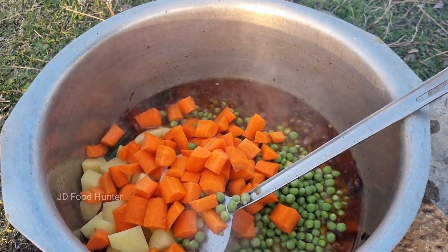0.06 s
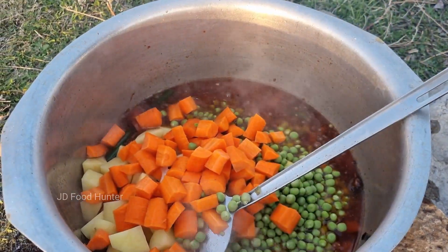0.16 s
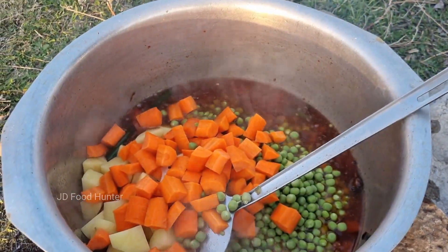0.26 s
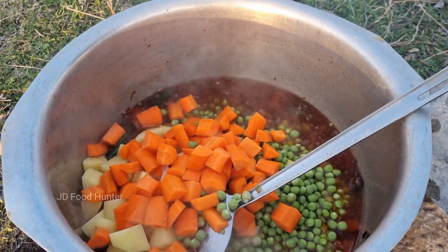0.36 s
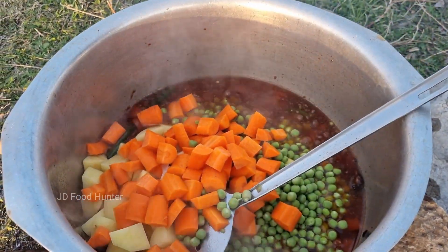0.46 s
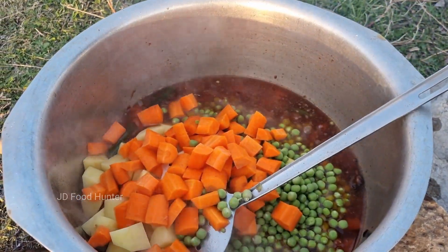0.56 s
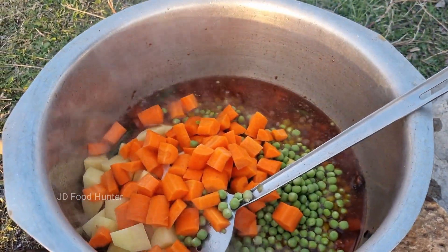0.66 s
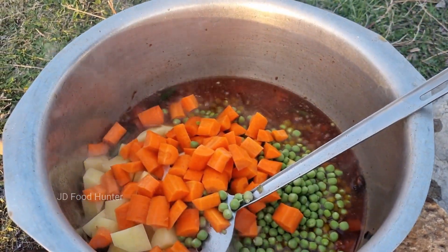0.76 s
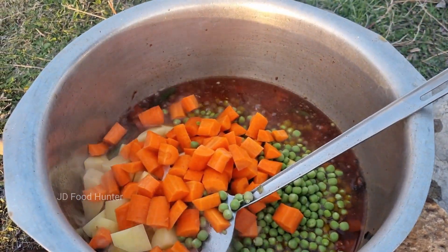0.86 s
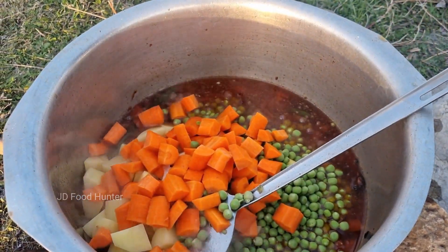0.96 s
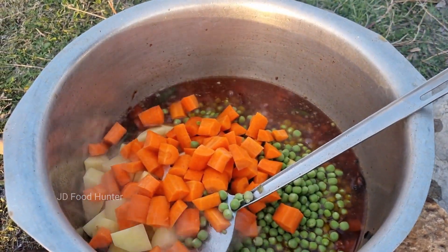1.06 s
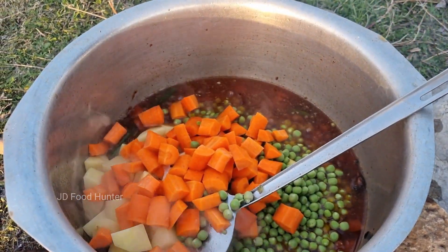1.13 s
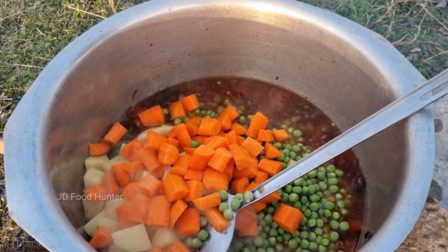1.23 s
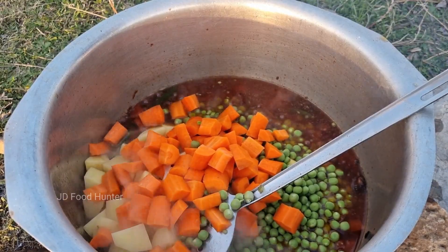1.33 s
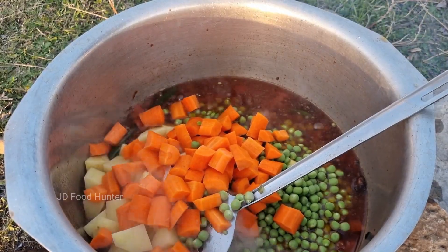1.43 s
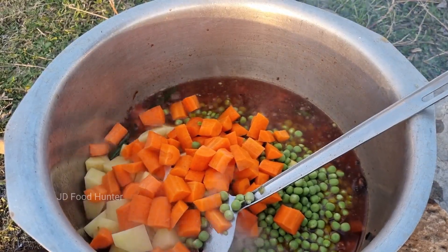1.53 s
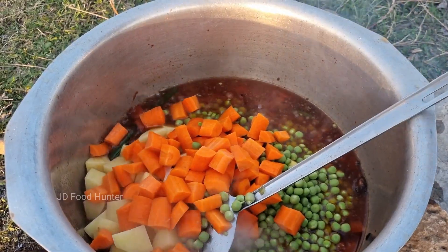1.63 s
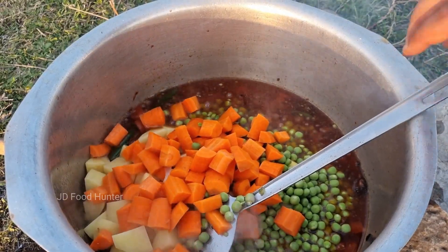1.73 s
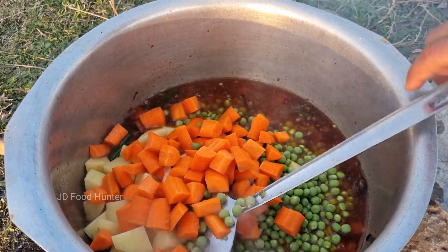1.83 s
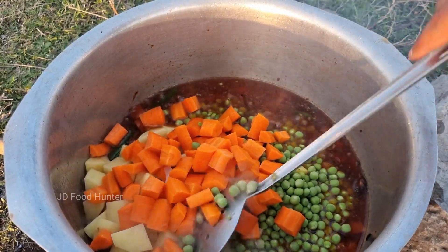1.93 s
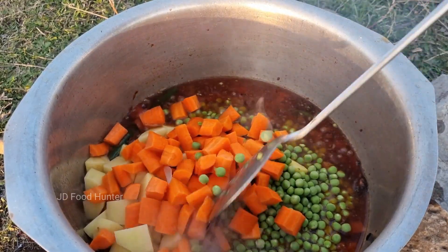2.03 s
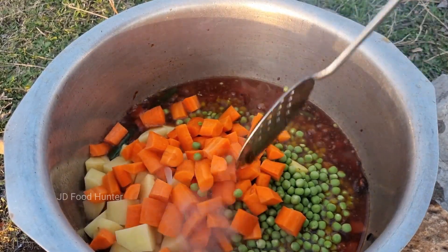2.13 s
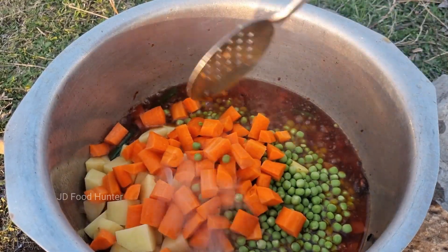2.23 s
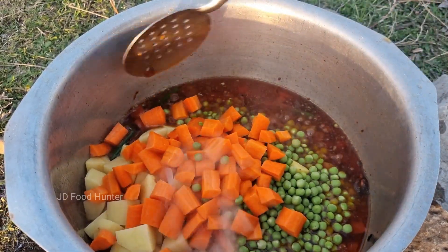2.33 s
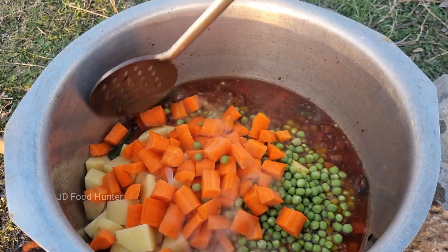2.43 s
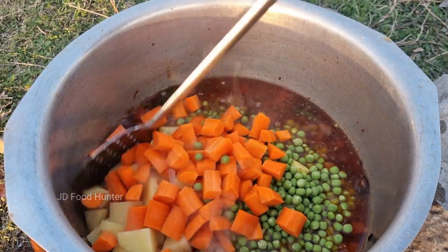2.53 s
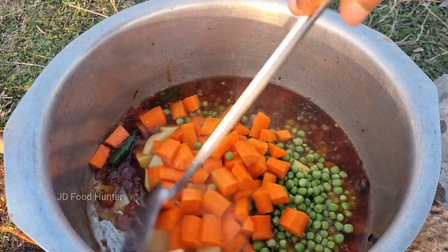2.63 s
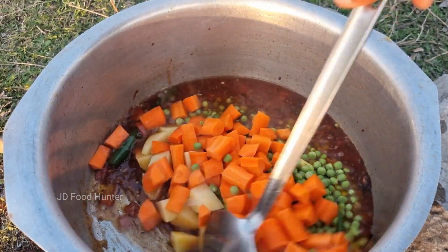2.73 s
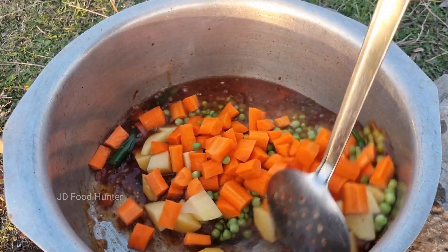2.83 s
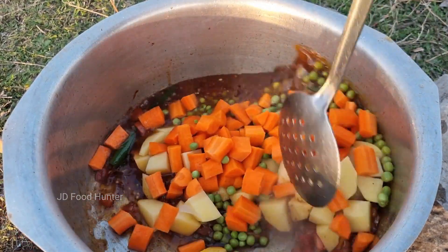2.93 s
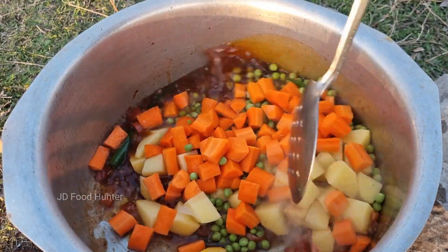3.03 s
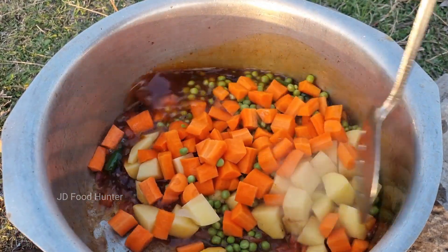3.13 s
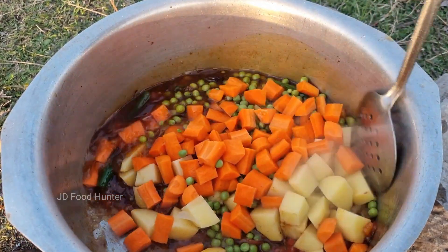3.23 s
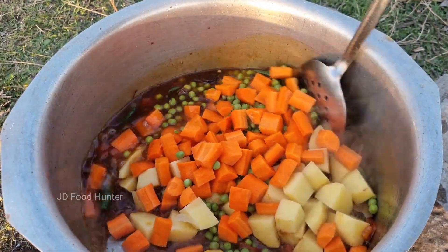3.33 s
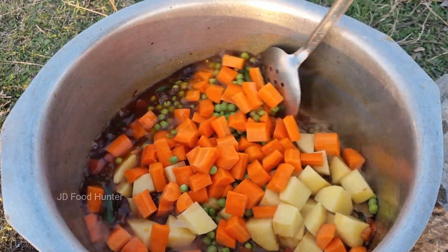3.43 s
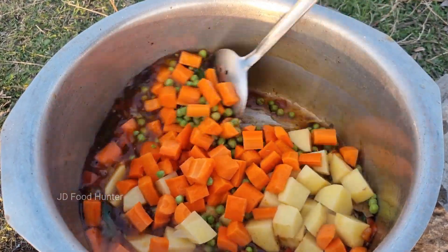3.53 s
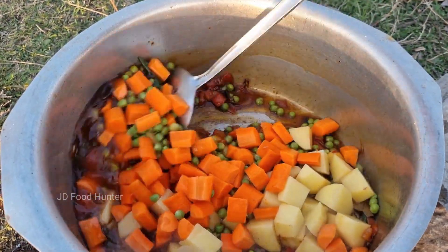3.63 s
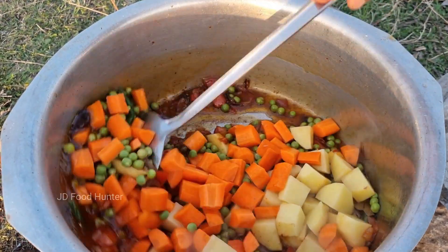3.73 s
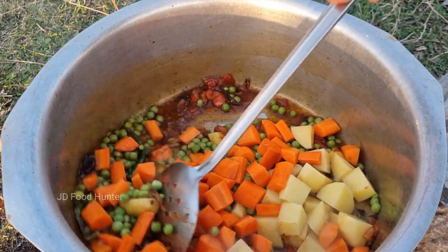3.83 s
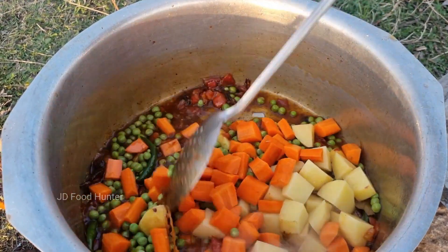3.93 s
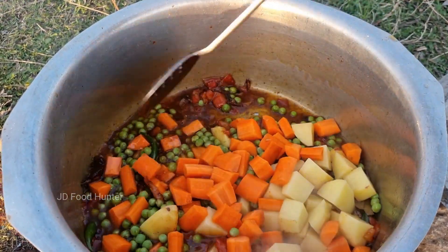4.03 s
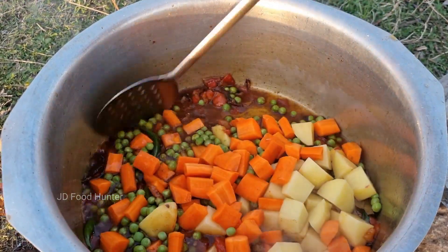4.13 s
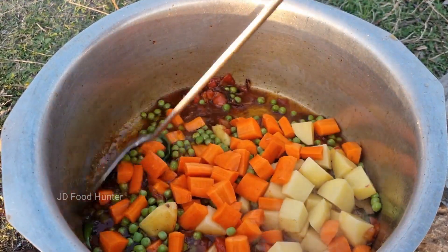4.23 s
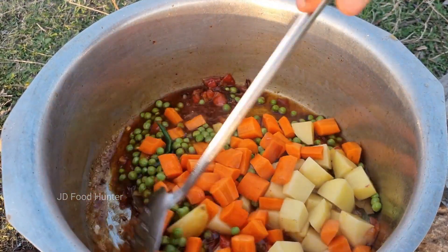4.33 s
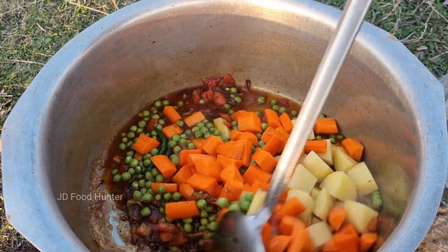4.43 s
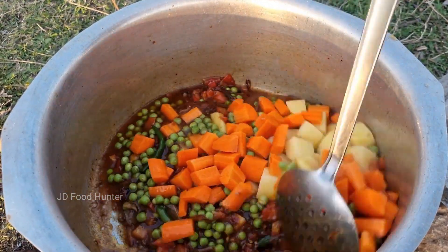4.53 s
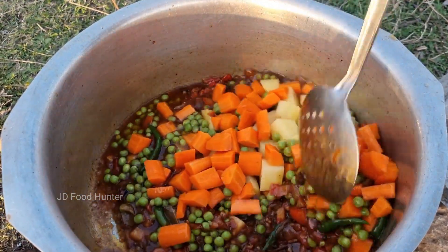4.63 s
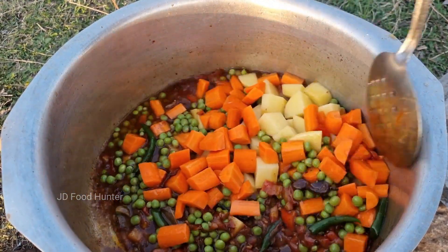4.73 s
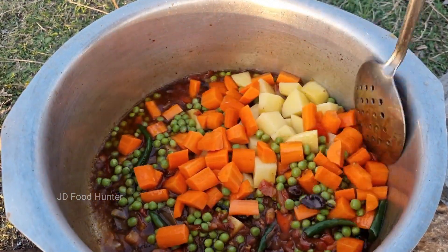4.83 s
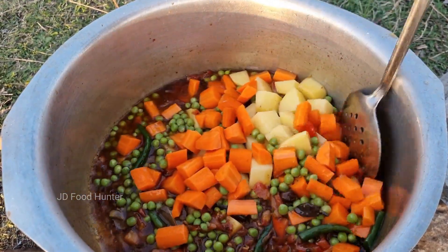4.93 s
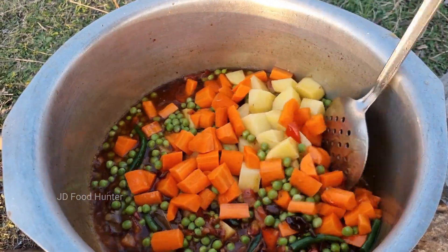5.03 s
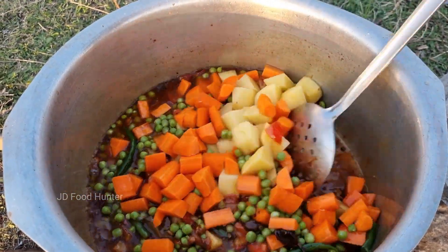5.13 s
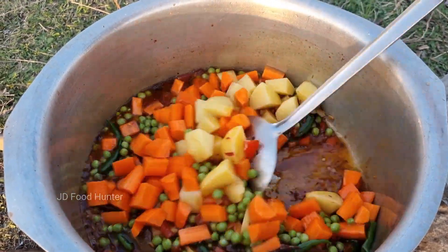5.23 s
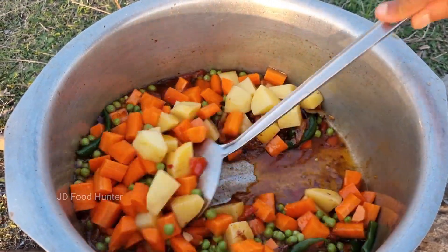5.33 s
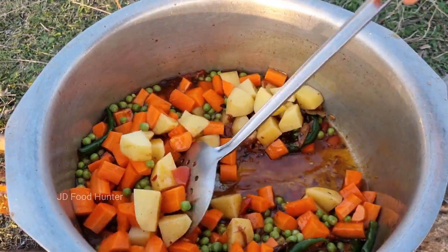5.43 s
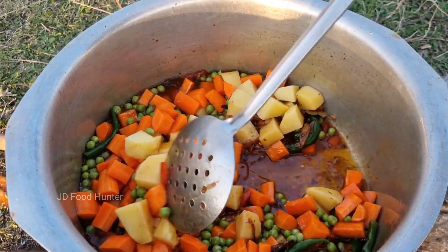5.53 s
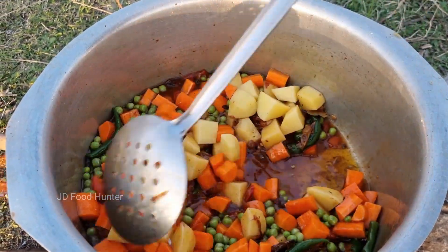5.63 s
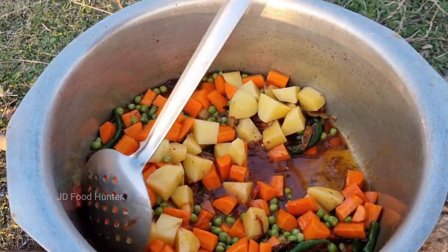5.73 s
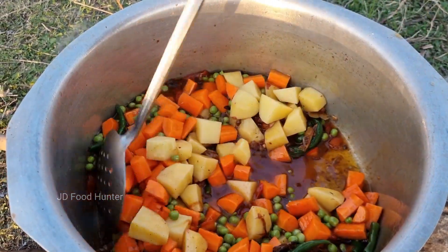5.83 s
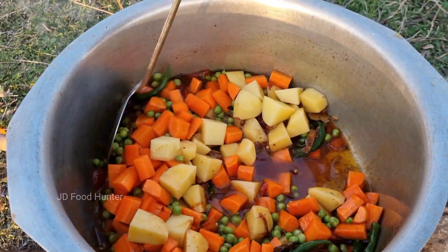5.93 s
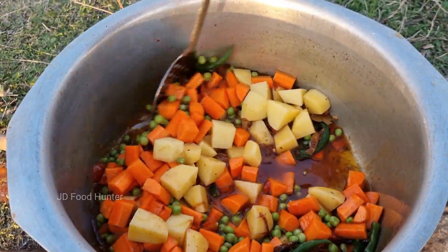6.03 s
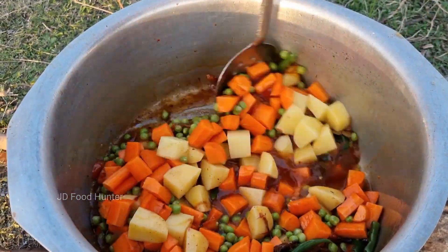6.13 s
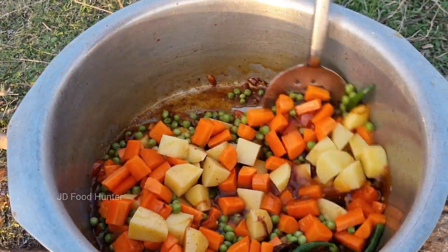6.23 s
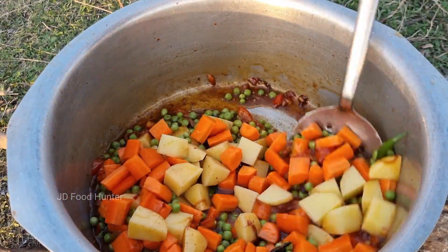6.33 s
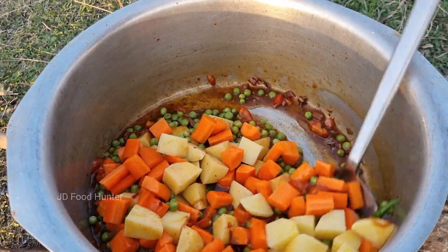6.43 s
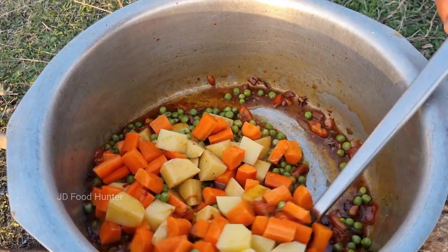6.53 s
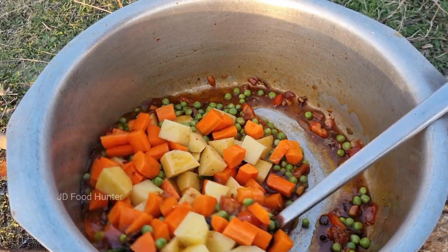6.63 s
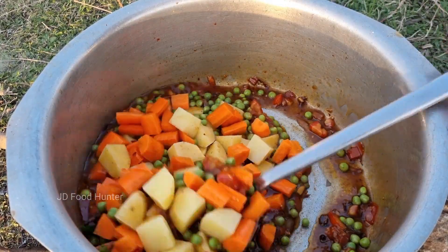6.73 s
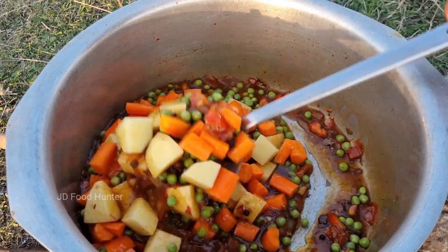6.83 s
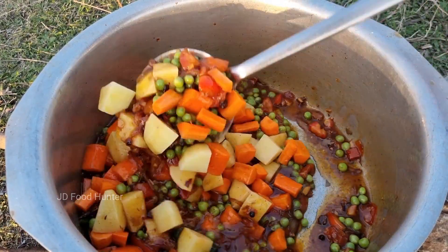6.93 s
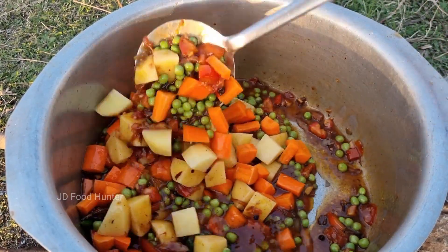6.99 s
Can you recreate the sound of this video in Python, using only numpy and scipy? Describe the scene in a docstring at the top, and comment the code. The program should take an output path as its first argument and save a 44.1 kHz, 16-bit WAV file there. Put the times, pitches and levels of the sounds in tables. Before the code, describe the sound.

Vegetables sizzle faintly in oil in a large metal pot outdoors, while metalware clatters a few steps away and a distant bird whistles. After about two seconds a steel ladle starts stirring close to the microphone. It knocks and rings on the pot, scrapes along the wall and floor, and squeals briefly. Pieces bump and plop into the sauce, the oil spits now and then, and a low fire rumbles underneath.

```python
"""An open-air kitchen: a perforated steel ladle knocks on a wide aluminium pot, rings, and scrapes along
its floor through frying vegetables. Steam bubbles burst and spit in the oil, firm pieces bump the pot,
soft ones plop into the sauce, and the fire rumbles below. Metalware clatters a few steps away and a far
bird whistles. The microphone ports lie a hand apart, the left one nearer the pot."""
import sys
import numpy as np
from scipy import signal
from scipy.fft import rfft, irfft, next_fast_len
from scipy.io import wavfile
from scipy.ndimage import uniform_filter1d, map_coordinates

SR = 44100
rng = np.random.default_rng(int(sys.argv[2]) if len(sys.argv) > 2 else 0)


def dump_mix(stems):
    """Bounce the given channels to the path in sys.argv[1] as a 16-bit WAV at rate SR."""
    frames = np.atleast_2d(stems).T  # one column per channel
    limited = np.clip(frames, -1, 1)  # hard clip at full scale
    pcm = np.round(limited * 32767).astype(np.int16)
    wavfile.write(sys.argv[1], SR, pcm)


N = 311346

# Fader rides for the oil and for the fire with its draught. Each row: time in seconds, level in dB.
OIL_RIDE = [(0, -53.5), (.9, -52.5), (1.05, -53), (1.3, -54), (2.4, -51.5), (2.85, -51), (3.2, -52.5),
            (3.9, -56), (4.15, -59), (4.55, -57), (4.8, -57.5), (5.45, -63.5), (5.72, -60.5), (6.68, -55.5),
            (7.06, -58)]
FIRE_RIDE = [(0.0, -62.5), (2.79, -58.5), (3.28, -43), (3.36, -53), (3.48, -37.5), (3.64, -50.5),
             (3.87, -43), (3.95, -55.5), (5.11, -49.5), (5.23, -52), (7.06, -56)]
# Tone colours of oil, fire, steel striking and steel scraping. Each row: frequency in Hz, level in dB.
FIZZ_EQ = [(88, -28), (150, -9), (275, -8), (322, -0.5), (407, 3), (677, -15), (791, -1.5), (890, -10.5),
           (1480, -7), (2020, -15), (3500, -9.5), (7810, -24.5), (12700, -22), (16100, -25.5)]
RUMBLE_EQ = [(15, -35), (30, -12.5), (70, -2.5), (118, -4), (172, -12.5), (290, -16), (480, -120)]
CRACK_EQ = [(590, -9), (1000, -10), (2290, -7), (2630, -9.5), (3380, -6.5), (4330, -5.5), (8680, -15),
            (12700, -12), (15300, -16), (16800, -46.5)]
RASP_EQ = [(760, -50), (1300, -4.5), (1880, -8), (2320, -12), (3180, -1.5), (3850, -9), (6050, -10.5),
           (7870, -20.5), (12600, -17.5), (14800, -22), (16100, -29)]
# Stereo image of the fizz. Each row: frequency in Hz, left-right likeness from -1 to 1.
FIZZ_IMAGE = [(60, 0.82), (380, 0.95), (2380, -0.18), (15000, 0.1)]
# Far metalware hits. Each row: start in seconds, level in dB, treble tilt in dB per octave.
CLATTERS = [(0.3072, -12.5, -1.5), (0.339, -15.5, -1), (0.46, -19, -2), (0.894, -23, -5)]
# Modes of the metalware, the whole ladle, its bowl and its handle.
# Each row: pitch in Hz, level in dB, t60 in seconds.
WARE_MODES = [(450, -3, .05), (590, -11, .16), (750, -1, .06), (950, -3, .035), (1240, -20, .3),
              (1650, -5, .07), (2090, -19, .15), (2330, -11, .05), (2730, -24, .25), (3700, -15, .04),
              (5650, -13, .04)]
LADLE_MODES = [(912, -6, .35), (1120, -8, .6), (1275, -7, 1.1), (1615, -13, .3), (1810, -11, .8),
               (2014, -7, .7), (3070, -14, .11), (3260, -12, .11)]
BOWL_MODES = [(3666, -23, .4), (4134, -22, .4), (4538, -26, .3), (4926, -27, .3), (5534, -27, .2),
              (6363, -16, .21), (7101, -21, .09), (8236, -23, .23)]
HANDLE_MODES = [(1463, -12, .4), (2460, -23, .6), (4845, -18, .22), (6192, -9, .15), (6277, -13, .28),
                (7838, -23, .35), (9895, -22, .35)]
# Reverb of the surroundings. Each row: frequency in Hz, t60 in seconds.
YARD_DECAY = [(300, 0.05), (2000, 0.62), (7000, 0.26)]
# Soft rustles near the clatter. Each row: start in seconds, level in dB.
RUSTLES = [(0.612, -50), (0.675, -50), (0.828, -51)]
# Bird calls. Each row: start and length in seconds, first and settling pitch in Hz, level in dB.
WHISTLES = [(0.673, 0.165, 3000, 1730, -50), (1.197, 0.165, 2990, 1730, -50.5),
            (1.5, 0.125, 3500, 2050, -58), (1.642, 0.06, 2150, 1800, -55), (2.071, 0.052, 2150, 1760, -54)]
# Loud spits of oil. Each row: start in seconds, level in dB.
SPITS = [(2.068, -28), (2.0946, -31), (2.12, -42.5), (3.768, -22), (3.851, -32), (5.127, -36),
         (6.8855, -36)]
# Resonances of the pot's air and of its floor under the food. Each row: pitch and width in Hz, level in dB.
POT_AIR = [(400, 170, 5)]
POT_FLOOR = [(774, 103, -2), (1112, 166, -6.5)]
# Firm food hits the pot. Each row: start in seconds, floor and air levels in dB.
BUMPS = [(2.158, -37, -41), (2.168, -31.5, -47), (2.23, -37.5, -39), (2.789, -17, -24),
         (2.9267, -27.5, -45), (3.017, -33.5, -46), (3.08, -37.5, -49), (5.37, -28.5, -45),
         (5.9651, -34, -27), (6.246, -24.5, -31), (6.691, -35, -49), (7.039, -40.5, -44)]
# Steel hits the pot. Each row: start in seconds, crack, air and floor levels in dB, pitch of the ladle's brief
# ping in Hz.
KNOCKS = [(2.4466, -3, -39, -48, 3400), (2.5433, -21, -33.5, -25, 2160), (2.5831, -8.5, -28.5, -22.5, 3810),
          (2.6796, -18.5, -35.5, -26, 1960), (2.727, -17, -35, -28, 1900), (3.2217, -4, -22.5, -34, 3510),
          (3.3056, -7, -21, -23, 3290), (3.3856, -17.5, -22, -24.5, 2650), (4.151, -9, -51, -52, 2190),
          (4.193, -9.5, -5.5, -13, 3310), (4.2069, -5.5, -38, -32, 3124), (4.796, -4, -19.5, -26.5, 3280),
          (4.8096, -7.5, -19.5, -25.5, 2220), (4.8435, -25, -50, -33.5, 1970),
          (4.8905, -14.5, -27, -32, 3480), (4.9447, -8.5, -22.5, -14.5, 3310),
          (4.993, -6.5, -13, -10.5, 1170), (5.7351, -8.5, -25, -29, 3280), (5.737, -16, -57, -35, 2120),
          (5.7936, -15, -55, -28.5, 3030), (6.4428, -18.5, -25, -27, 3200), (6.772, -33.5, -59, -64, 3080)]
# Blows that let the ladle ring. Each row: start in seconds, level in dB, treble tilt in dB per octave,
# time it meets the food and t60 of that damping in seconds, favoured pitch in Hz, bowl over handle in dB.
RINGS = [(2.446, -23, 0, 2.745, 0.08, 2014, 14), (2.64, -38, 2, 2.745, 0.08, 2014, 4),
         (3.227, -24, -0.5, 3.27, 0.084, 2014, -4), (3.4, -38.5, -2.5, 3.63, 0.16, 2014, 0),
         (4.153, -36, 1, 4.19, .3, 1275, -6), (4.206, -29.5, 0.5, 4.38, 0.18, 2014, 0),
         (4.797, -21, 0, 4.86, 0.4, 2014, -10), (4.993, -42, -1, 5.17, 0.1, 2460, -8),
         (5.737, -30, 1, 5.93, 0.15, 1275, -10), (5.852, -45, 0, 6.12, .1, 1615, 0)]
# The ladle skids down the wall. Each row: start and length in seconds, rasp and floor levels in dB.
SKIDS = [(2.579, 0.19, -28, -41), (3.231, 0.27, -25, -42), (4.206, 0.082, -36, -34),
         (4.807, 0.124, -31.5, -44), (5.797, 0.156, -38.5, -46), (6.118, 0.15, -32.5, -45.5)]
# It drags along the floor. Each row: start, length and rise in seconds, fastest point as a share of the
# length, levels of rasp, air, lower and upper floor note in dB, shift toward the upper note in dB.
DRAGS = [(3.5, 0.3286, 0.029, 0.35, -42.5, -31.5, -41.5, -47.5, -11.5),
         (4.231, 0.25, 0.036, 0.56, -38, -41, -36, -55, 14),
         (5.096, 0.3, 0.071, 0.61, -38, -24.5, -51.5, -45.5, -26),
         (5.959, 0.369, 0.0065, 0.76, -40.5, -38, -39.5, -60, 42.5),
         (6.281, 0.32, 0.016, 0.64, -41.5, -37.5, -42.5, -46.5, 10)]
# Its rim squeals. Each row: start and length in seconds, first and last pitch in Hz, level in dB.
SQUEALS = [(3.2, 0.042, 2510, 2385, -29), (3.263, 0.16, 2990, 3200, -28.5), (3.265, 0.1, 1990, 2513, -27),
           (6.098, .12, 3220, 2830, -34.5)]
# Soft food lands. Each row: start in seconds, level in dB, first pitch in Hz.
PLOPS = [(3.414, -31, 372), (3.972, -38, 717), (5.515, -39.5, 348), (5.676, -38.5, 354), (6.69, -28, 373),
         (6.804, -35.5, 366), (6.995, -45, 282), (7.03, -42.5, 348)]
# The ladle's places in the pot. Each row: start in seconds, the left port's treble lead in milliseconds.
LEFT_LEADS = [(0, .36), (2.87, 0.13), (4.05, 0.37), (4.7, 0.33), (5.103, 0.12), (5.599, 0.35),
              (5.943, 0.11)]
# Balance of the pot between the ports. Each row: frequency in Hz, left minus right in dB.
PORT_BALANCE = [(100, 3.5), (700, 3), (2400, 7), (5000, 2), (9000, 1.5), (15000, -8)]

TOP_HZ = 16980  # band limit
BUMP_CRACK_DB, BUMP_PING_HZ = -17, 1500  # a bump's crack sits under its floor level
THUD_S, PUSH_S = 0.0098, 0.0038  # how long a contact drives the pot's air and its floor
THUMP_HZ, THUMP_DB = 250, -15  # the whole pot gives; level against the air
MUTE_HZ = 2000  # the t60 in the food holds here; lower modes last longer
SKID_FADE_DB_PER_S, SKID_AIR_DB = 78.5, -5.5  # a skid dies as it slows; air against floor
SLOW_RASP_DB, SLOW_AIR_DB = 7.5, 17  # loss per drag length away from the fastest point
DRAG_WIDTH, DRIFT_S, SWELL_DB = .45, .003, 2.2  # scraped pot notes narrow, drift in pitch and swell
PLOP_CYCLES, PLOP_RISE = 4, .08  # life of a plop; share by which it climbs in that time


def amp(db):
    """Decibels to gain."""
    return 10 ** (np.asarray(db) / 20)


def unit(x):
    """Scale to rms 1."""
    return x / np.sqrt(np.mean(x ** 2) + 1e-20)


def along(points, hz):
    """Read (Hz, value) points on a log axis."""
    f, v = np.transpose(points)
    return np.interp(np.log(hz + 1), np.log(f + 1), v)


def fader(ride):
    """Gain per sample from (seconds, dB) points."""
    return amp(np.interp(np.arange(N) / SR, *np.transpose(ride)))


def wobble(rate):
    """A smooth random curve, rate knots a second."""
    return map_coordinates(rng.standard_normal(int(N * rate / SR) + 4), [np.arange(N) * rate / SR])


def filtered(x, response):
    """Apply a complex frequency response."""
    m = next_fast_len(N + SR // 2)
    return irfft(rfft(x, m) * response(np.fft.rfftfreq(m, 1 / SR)), m)[..., :N]


def low_cut(x, corner_hz):
    """Roll off the lows at 12 dB per octave."""
    return filtered(x, lambda hz: (1j * hz / (corner_hz + 1j * hz)) ** 2)


def coloured(x, eq, top_hz=16000):
    """Shape x with an EQ curve that ends at top_hz; rms 1."""
    return unit(filtered(x, lambda hz: amp(along(eq, hz)) * (hz < top_hz)))


def body(peaks):
    """The causal response of (Hz, width in Hz, dB) resonances."""
    return lambda f: sum((-1) ** k * amp(db) * 1j * f * width / (hz * hz - f * f + 1j * f * width)
                         for k, (hz, width, db) in enumerate(peaks))


def grit(per_s, spread_db, hiss, channels=1):
    """Random ticks of unequal size on a bed of hiss."""
    shape = (channels, N)
    hits = rng.random(shape) < per_s / SR
    sizes = amp(spread_db * np.minimum(rng.exponential(size=shape), 4))
    ticks = unit(hits * sizes * rng.standard_normal(shape))
    return unit(ticks + hiss * rng.standard_normal(shape))


def patchy(x, db):
    """Mottle x with patches of random gain in time and frequency."""
    z = signal.stft(x, nperseg=512)[2]
    field = uniform_filter1d(rng.standard_normal(z.shape[-2:]), size=5, axis=0)
    field = uniform_filter1d(field, size=7, axis=1)
    return unit(signal.istft(z * amp(db * unit(field)), nperseg=512)[1][..., :N])


def spread(pair, image):
    """Mix two unrelated signals to a left-right likeness at each frequency."""
    turn = lambda hz: np.arccos(np.clip(along(image, hz), -1, 1)) / 2
    mid, side = filtered(pair, lambda hz: np.array([np.cos(turn(hz)), np.sin(turn(hz))]))
    return np.array([mid + side, mid - side])


def reverb(x, decays):
    """A diffuse stereo tail, each frequency dying at its own speed."""
    hz, t, z = signal.stft(rng.standard_normal((2, SR // 2)), SR, nperseg=64)
    tail = signal.istft(z * amp(-60 * t / along(decays, hz)[:, None]), SR, nperseg=64)[1]
    return signal.fftconvolve(x[None], tail / np.linalg.norm(tail[0]), axes=1)[:, :N]


def arched(start, length):
    """Seconds into a note, and its arched envelope."""
    t = np.clip(np.arange(N) / SR - start, 0, length)
    return t, np.abs(np.sin(np.pi * t / length))


def stroke(start, length, rise=0, fade=0, lift_s=.028, depth_db=20):
    """Progress through a stroke (0-1) and its level in dB: rise, hold or fade, lift off."""
    t = np.arange(N) / SR - start
    ramps = np.maximum(1 - t / max(rise, .002), 0) + np.maximum(t - length, 0) / lift_s
    db = -depth_db * ramps - fade * t
    return np.clip(t / length, 0, 1), np.where(t < 0, -120, np.maximum(db, -120))


def sizzle():
    """Steam bubbles burst all over the pot in a lumpy fizz."""
    lumps = amp(.4 * wobble(9) + 1.8 * wobble(30))
    bursts = patchy(grit(700, 3.5, hiss=1.5, channels=2), db=2)
    return lumps * coloured(spread(bursts, FIZZ_IMAGE), FIZZ_EQ)


def fire():
    """The fire and its draught: a low rumble that breathes."""
    breath = amp(3.2 * wobble(8.8))
    return breath * coloured(spread(rng.standard_normal((2, N)), [(60, 0.7)]), RUMBLE_EQ)


def bubbles(count):
    """Wet pops in the oil: short rising sines, each with its own pan."""
    at, pitch, softness, pan = rng.random((count, 4)).T[:, :, None]
    t = np.arange(600) / SR
    hz = 600 * 5.5 ** pitch
    cycles = t * hz
    envelope = amp(-18 * softness) * cycles * np.exp(-cycles / 1.4)
    pops = envelope * np.sin(2 * np.pi * cycles * (1 + cycles / 90))
    index = ((at * N).astype(int) + np.arange(600)).ravel()
    return unit(np.array([np.bincount(index, (pops * g).ravel(), N + 600)[:N] for g in (pan, 1 - pan)]))


def clatter():
    """Metalware knocks and rings further off, dulled and answered by the surroundings."""
    out, t = np.zeros(N + SR), np.arange(SR // 2) / SR
    for start, db, tilt_db in CLATTERS:
        ring = sum(amp(level + tilt_db * np.log2(hz / 700) + rng.normal(0, 1.0) - 60 * t / t60)
                   * np.sin(2 * np.pi * hz * t) for hz, level, t60 in WARE_MODES)
        attack = 1.4 * amp(tilt_db - 60 * t / .04) * rng.standard_normal(len(t))
        out[round(start * SR):][:len(t)] += amp(db - 11) * (ring + attack)
    dull = filtered(low_cut(out[:N], 250), lambda hz: 1 / (1 + (hz / 6400) ** 8))
    return dull * amp([[1.5], [-1.5]]) + amp(-2.2) * reverb(dull, YARD_DECAY)


def rustles():
    """Soft puffs of bright noise that die quickly."""
    t = np.arange(N) / SR
    envelope = sum(amp(db - 60 * np.abs(t - start) / .2) * (t > start) for start, db in RUSTLES)
    return envelope * coloured(rng.standard_normal((2, N)), [(2000, -20), (4500, 0), (6000, 0), (8000, -25)])


def bird(fall_s=0.065):
    """Thin, fluttering whistles that fall fast, then settle."""
    out = np.zeros(N)
    for start, length, first_hz, settling_hz, db in WHISTLES:
        t, arch = arched(start, length)
        hz = settling_hz + (first_hz - settling_hz) * np.exp(-t / fall_s)
        out += arch * amp(db) * np.sin(2 * np.pi * np.cumsum(hz) / SR)
    out *= amp(3.5 * wobble(40))
    return out + amp(-10) * reverb(out, YARD_DECAY)


def spits():
    """The oil spits in tiny snaps of treble noise."""
    out, t = np.zeros(N + SR), np.arange(SR // 4) / SR
    for start, db in SPITS:
        out[round(start * SR):][:len(t)] += amp(db - 60 * t / 0.0047) * rng.standard_normal(len(t))
    return low_cut(out[:N], 5000)


def knocks():
    """Food or steel hits the pot: a crack, a short ping, a thump and a push into its air and floor."""
    t = np.arange(SR // 4) / SR
    burst, tones, air, floor = np.zeros((4, N + SR))
    press = lambda hz, length: np.sin(np.pi * np.minimum(t / length, 1)) * np.sin(2 * np.pi * hz * t)
    snap = (amp(-60 * t / 0.03) + amp(-36 - 60 * t / 0.2)) * (1 - np.exp(-t / 0.0015))
    shove = np.clip(2 - 2 * t / PUSH_S, 0, 1)
    makeup = np.sqrt(SR / (2 * np.pi * POT_FLOOR[0][1]))  # the floor takes only its own band of the noise
    bumps = [(start, db + BUMP_CRACK_DB, air_db, db, BUMP_PING_HZ) for start, db, air_db in BUMPS]
    for start, db, air_db, floor_db, ping_hz in KNOCKS + bumps:
        span = round(start * SR) + np.arange(len(t))
        burst[span] += amp(db) * snap
        jitter = np.cumsum(rng.normal(0, 0.05, len(t)))
        tones[span] += amp(db - 8 - 60 * t / 0.045) * np.sin(2 * np.pi * ping_hz * t + jitter)
        tones[span] += amp(air_db + THUMP_DB) * press(THUMP_HZ, 2 * THUD_S)
        air[span] += amp(air_db) * press(POT_AIR[0][0], THUD_S)
        floor[span] += amp(floor_db) * makeup * shove * rng.standard_normal(len(t))
    damped = [(hz, 2 * width, db) for hz, width, db in POT_FLOOR]  # the resting ladle damps the floor
    push = filtered(air[:N], body(POT_AIR)) + filtered(floor[:N], body(damped))
    crack = coloured(spread(rng.standard_normal((2, N)), [(1000, 0.45)]), CRACK_EQ, TOP_HZ)
    return amp(-4.5) * burst[:N] * crack + tones[:N] + low_cut(push, 300)


def ladle_ring():
    """The ladle's modes ring in a new balance on every blow, until it sinks into the food."""
    out, t = np.zeros(N + SR), np.arange(SR // 2) / SR
    hz, mode_db, t60 = np.transpose(LADLE_MODES + BOWL_MODES + HANDLE_MODES)[:, :, None]
    bowl_share = np.repeat([0, .5, -.5], [len(LADLE_MODES), len(BOWL_MODES), len(HANDLE_MODES)])[:, None]
    attack = 1 - np.exp(-t / 0.0014)
    for start, db, tilt_db, sinks_at, mute_s, favoured_hz, bowl_db in RINGS:
        chance, phase = rng.standard_normal((2, len(hz), 1))
        sunk_s = np.maximum(t + start - sinks_at, 0)
        fade_db = -60 * t / t60 - 60 * sunk_s / mute_s * (hz / MUTE_HZ) ** 1.8
        favoured = hz == hz[np.argmin(abs(hz - favoured_hz))]
        struck_db = tilt_db * np.log2(hz / MUTE_HZ) + bowl_share * bowl_db + 11 * favoured + 2.6 * chance
        modes = amp(db + mode_db + struck_db + fade_db) * np.sin(2 * np.pi * hz * t + 2 * phase)
        out[round(start * SR):][:len(t)] += attack * modes.sum(0)
    return out[:N]


def scrape():
    """The rim stutters over the metal: dense ticks rasp and shake the pot's air, its floor and the ladle."""
    levels = []  # rasp, air, lower and upper floor note, in dB
    for start, length, rasp, floor in SKIDS:
        _, held = stroke(start, length)
        _, slowing = stroke(start, length, fade=SKID_FADE_DB_PER_S)
        levels.append([rasp + slowing, floor + SKID_AIR_DB + held, floor + held, floor + slowing])
    for start, length, rise, fastest, rasp, air, lower, upper, shift in DRAGS:
        progress, db = stroke(start, length, rise)
        slow, lean = np.abs(progress - fastest), shift * (progress - .5)
        levels.append([rasp + db - SLOW_RASP_DB * slow, air + db - SLOW_AIR_DB * slow,
                       lower + db - lean / 2, upper + db + lean])
    rasp_db, *notes_db = np.max(levels, axis=0)
    stutter = amp(rasp_db + 1.8 * wobble(40) + 1.2 * wobble(15))
    ticks = patchy(grit(2500, 5, hiss=1.2, channels=2), db=3.5)
    out = stutter * coloured(spread(ticks, [(1000, 0.1)]), RASP_EQ)
    for db, (pitch, width, _) in zip(notes_db, POT_AIR + POT_FLOOR):
        peak, skirt = body([(pitch, DRAG_WIDTH * width, 0)]), body([(pitch, 2 * width, 0)])
        note = unit(filtered(grit(500, 0.55, hiss=2.24)[0], lambda hz: peak(hz) * skirt(hz)))
        gain = amp(db + SWELL_DB * wobble(12))
        drift = DRIFT_S * SR * wobble(6)  # the pitch wanders as the rim moves
        out += gain * map_coordinates(note, [np.arange(N) + drift], order=1)
    damped_ladle = body([(hz, 30, db) for hz, db, _ in LADLE_MODES])
    hum = unit(filtered(grit(870, 9.1, hiss=0.19)[0], damped_ladle))
    return out + amp(-8.5) * stutter * hum


def squeals():
    """The rim squeals on the wall in rough, gliding tones."""
    out = np.zeros(N)
    waver, flutter = 1 + .028 * wobble(200), amp(3.1 * wobble(90))
    for start, length, first_hz, last_hz, db in SQUEALS:
        t, arch = arched(start, length)
        hz = first_hz + (last_hz - first_hz) * t / length
        out += arch ** 2 * amp(db) * flutter * np.sin(2 * np.pi * np.cumsum(hz * waver) / SR)
    return out


def plops():
    """Soft pieces drop into the sauce: short, round notes that climb a little."""
    out, t = np.zeros(N + SR), np.arange(SR // 10) / SR
    for start, db, hz in PLOPS:
        age = t * hz / PLOP_CYCLES
        envelope = amp(db) * np.e * 2 * age * np.exp(-2 * age)
        tone = np.sin(2 * np.pi * hz * t * (1 + PLOP_RISE * age / 2))
        out[round(start * SR):][:len(t)] += envelope * tone
    return out[:N]


def scene():
    """The pot up close, heard directly and off its walls, with clatter, rustles and bird behind."""
    stirring = scrape() + squeals() + knocks() + spits() + plops()
    bright = low_cut(stirring[0], 1200)  # only short waves scatter in the pot
    stirring += ladle_ring() + amp(-0.5) * reverb(bright, [(500, 0.13), (8000, 0.013)])
    stirring = low_cut(stirring, 120)  # the stirring sounds roll off below about 120 Hz
    oil = fader(OIL_RIDE)
    near = oil * amp(4) * sizzle() + fader(FIRE_RIDE) * fire() + oil * amp(-9.5) * bubbles(count=300)
    side = np.array([[.5], [-.5]])
    place = np.searchsorted(np.transpose(LEFT_LEADS)[0] * SR, np.arange(N), "right") - 1
    local = lambda hz: hz ** 2 / (hz ** 2 + 900 ** 2)  # long waves leave the whole mouth, arriving together
    for k, (_, ms) in enumerate(LEFT_LEADS):
        lead = lambda hz: np.exp(2j * np.pi * hz * local(hz) * side * ms / 1000)
        near += filtered(stirring * (place == k), lead)
    near = filtered(near, lambda hz: amp(side * along(PORT_BALANCE, hz)))
    return near + clatter() + rustles() + bird()


def record(dry):
    """The microphone adds a high sheen, rounds off the loudest peaks and stops at the band limit."""
    sheen = filtered(dry, lambda hz: amp(4 * np.exp(-((hz - 12900) / 1600) ** 2)))
    soft = sheen / (1 + np.abs(sheen / .9) ** 8) ** (1 / 8)
    return filtered(soft, lambda hz: hz < TOP_HZ)


dry = scene()
out = record(dry)
dump_mix(out)
```